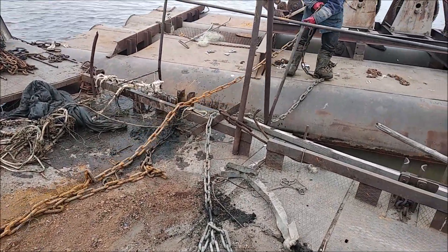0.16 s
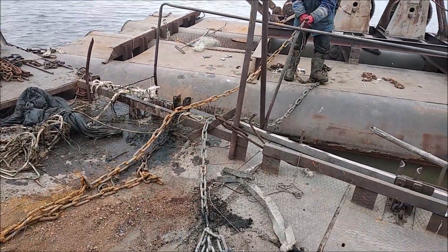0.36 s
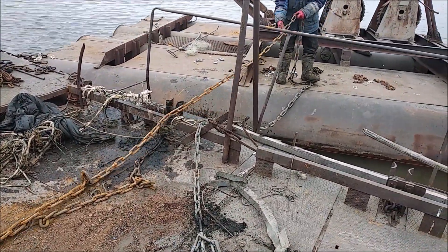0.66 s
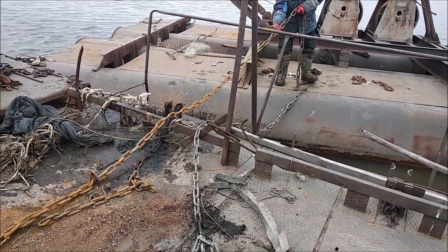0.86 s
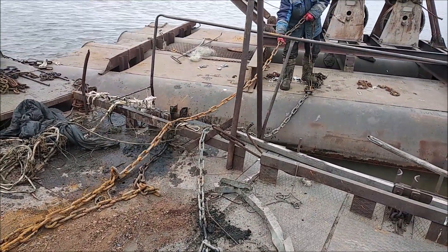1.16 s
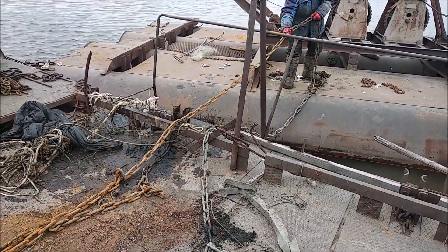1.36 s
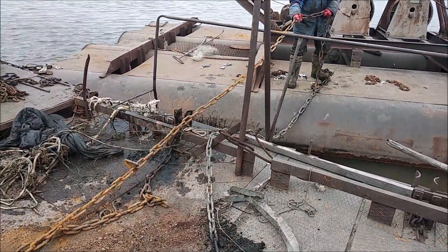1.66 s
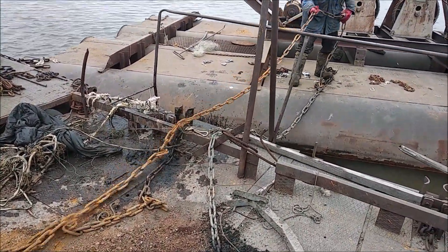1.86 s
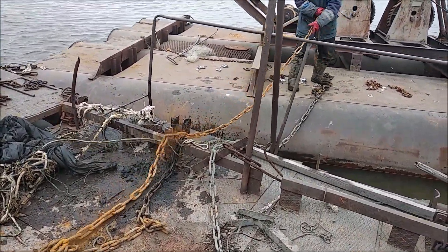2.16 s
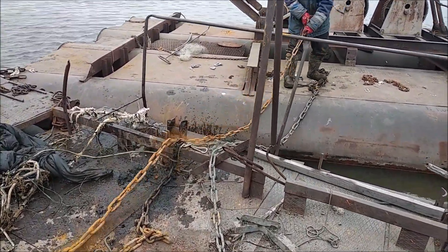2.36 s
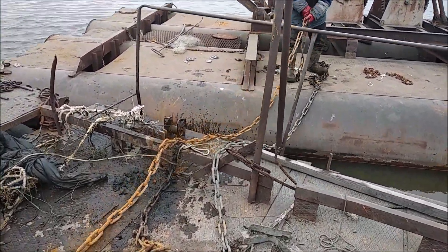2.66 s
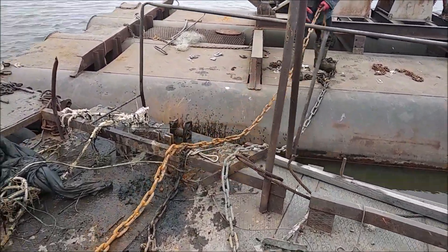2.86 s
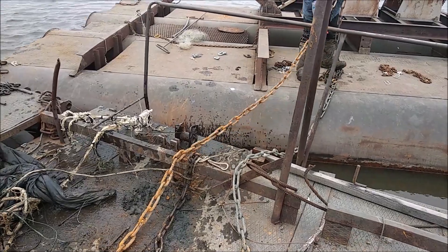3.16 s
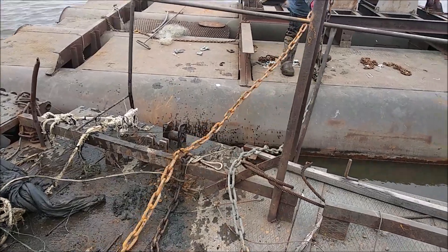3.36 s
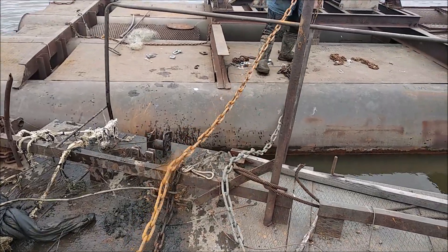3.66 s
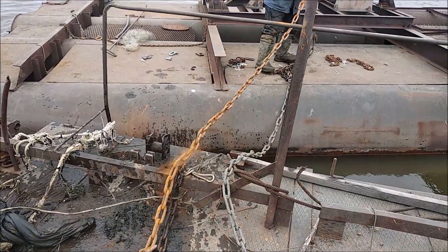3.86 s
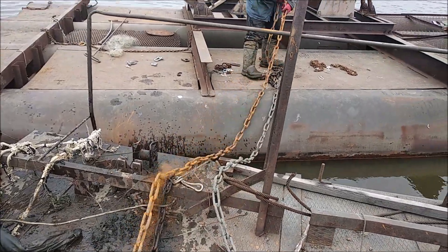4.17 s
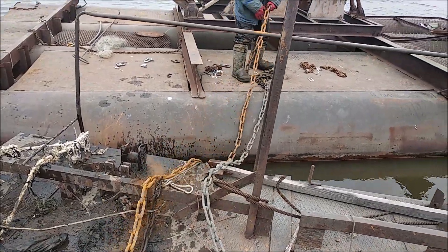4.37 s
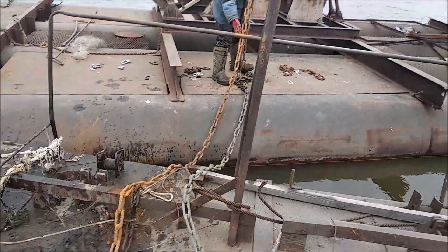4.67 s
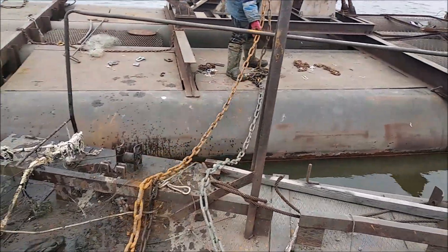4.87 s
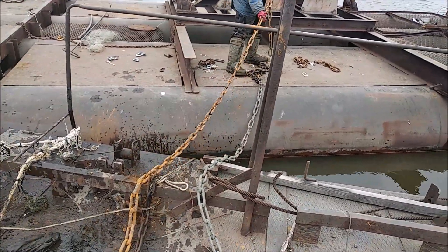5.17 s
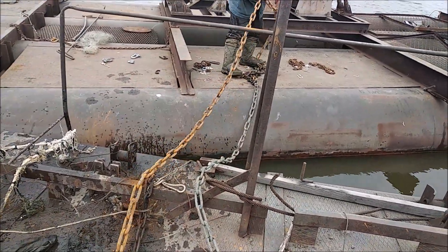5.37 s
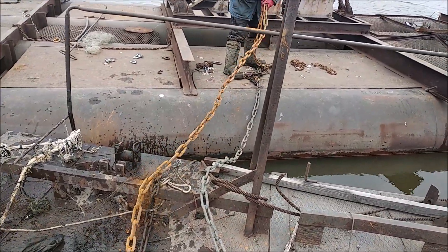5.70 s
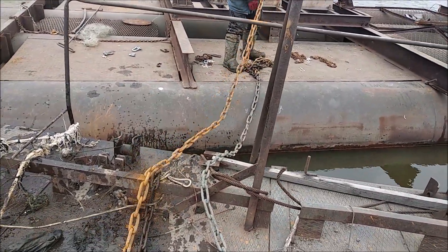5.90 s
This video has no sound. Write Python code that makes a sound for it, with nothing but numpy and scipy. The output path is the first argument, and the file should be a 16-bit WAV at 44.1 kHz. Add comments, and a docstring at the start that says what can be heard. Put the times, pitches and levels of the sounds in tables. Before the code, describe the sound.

A heavy rusty chain is hauled over a beam onto a hollow steel pontoon, outdoors on the water. Links clank on the plating, jingle against each other and scrape, while the hull booms softly. The pulling eases briefly, resumes with a hollow thump and harsh grinding, slackens, then ends with another rattling pull. Gusts buffet the microphone throughout, over a faint distant drone.

```python
"""A rusty steel chain is hauled over a beam onto a hollow steel pontoon, in gusty wind.
From the start, links clank on the plating, ring against each other and scrape off rust; the hull booms.
The haul eases near 1.4 s and resumes; the hull thumps at 3.79 s, the rust grinds hardest at 4.2 s.
The chain slackens from 4.6 s; a last pull starts at 5.3 s. Throughout, gusts buffet both microphone
ports over a faint far drone, and a gain control holds the loud moments down."""
import sys
import numpy as np
from scipy import signal
from scipy.fft import rfft, irfft, next_fast_len
from scipy.io import wavfile
from scipy.ndimage import uniform_filter1d, minimum_filter1d, map_coordinates

SR = 44100
rng = np.random.default_rng(int(sys.argv[2]) if len(sys.argv) > 2 else 0)


def write(x):
    x = np.atleast_2d(x).T
    wavfile.write(sys.argv[1], SR, np.round(np.clip(x, -1, 1) * 32767).astype(np.int16))


N = 266187

# Pull on the chain: t/s, rattle/dB, scrape/dB, jingle/dB
HAUL_LEVELS = [(0.0, -27, -35, -44), (0.28, -37, -37.5, -36), (0.4, -41.5, -61, -71),
               (0.44, -29.5, -36, -39), (0.68, -37, -41.5, -49), (0.86, -33.5, -41, -38),
               (1.11, -34, -44, -55), (1.33, -43.5, -49, -52), (1.4, -106, -72, -61), (1.46, -53, -83, -55),
               (1.58, -40.5, -49.5, -79), (1.8, -31, -33, -39), (2.5, -31.5, -38.5, -35),
               (2.6, -35.5, -62, -49), (2.78, -42, -60, -68), (2.89, -57, -53, -38),
               (2.93, -56, -42, -44.5), (3.25, -45.5, -65, -35.5), (3.29, -27, -43, -32.5),
               (3.41, -37, -50, -35), (3.52, -40.5, -41, -70), (3.66, -34, -31.5, -32),
               (3.95, -27, -25, -41), (4.1, -42, -34, -36), (4.2, -13.5, -18.5, -51),
               (4.34, -33.5, -36, -43), (4.44, -17, -30, -40), (4.57, -44, -41.5, -41),
               (4.63, -54, -69, -55), (4.69, -51, -47.5, -51), (4.77, -48.5, -74, -62),
               (5.04, -61, -71, -75), (5.33, -51, -58, -74), (5.35, -21, -32.5, -46), (5.55, -24, -37, -34),
               (5.65, -25.5, -37.5, -59), (5.7, -26.5, -36, -68), (6.04, -26, -42, -32)]
# Links dropping on the plate: t/s, level/dB, low-mode weight/dB, damping factor, favoured f/Hz
PLATE_CLANKS = [(0.0167, -14.5, -14, 0.85, 3100), (0.1637, -25, -24, 1.6, 3200),
                (0.203, -15, -10, 2.4, 3400), (0.266, -14, -18, 1.26, 3760),
                (0.4316, -15, -1.5, 0.61, 3050), (0.5171, -15.5, -2, 0.89, 2960),
                (0.664, -26.5, 5, 4.5, 2210), (0.898, -9, -3, 1.17, 3300), (1.0507, -18.5, -8, 2, 3100),
                (1.066, -21, 1, 2.3, 2400), (1.177, -31, -8, 3, 4200), (1.2868, -34, 14, 3, 2140),
                (1.446, -41, 7, 0.47, 3160), (1.598, -33.5, 9, 0.57, 1810), (1.662, -15.5, -5, 2.3, 3740),
                (1.9404, -26.5, 6, 1.7, 1630), (1.9662, -20.5, -4, 0.89, 2100),
                (2.0219, -19, 2, 0.75, 3040), (2.082, -14, 1.5, 2, 1620), (2.1423, -19, -2.5, 1.35, 3230),
                (2.282, -16.5, -2, 0.92, 3100), (2.358, -14, 4.5, 1.1, 1150),
                (2.4243, -14, -2.5, 0.59, 2320), (2.5171, -13, -6.5, 1.3, 3000),
                (2.604, -20.5, -11, 3.4, 3020), (2.782, -23, 1.5, 1.4, 2880),
                (2.9159, -18.5, -3.5, 0.76, 3080), (2.9474, -23.5, -0.5, 0.77, 2090),
                (3.044, -5.5, -11.5, 1.64, 2220), (3.0988, -12.5, -2.5, 2.2, 3120),
                (3.273, -10.5, -4.5, 1.16, 3150), (3.3214, -11, -3.5, 1.53, 724),
                (3.5777, -23.5, 5, 1.06, 1970), (3.6009, -26, 4, 1.5, 2900), (3.6465, -21, 8, 1.7, 1780),
                (3.672, -20, 3, 2.8, 2870), (3.717, -17.5, -4, 0.36, 1810), (3.766, -10.5, 2, 1.5, 2740),
                (3.844, -20, -6, 1.1, 2170), (3.8851, -13.5, 2.5, 1.6, 2930), (3.9384, -38, -4, 1.8, 2500),
                (3.9608, -19.5, -10, 0.27, 3020), (3.9962, -12, -3, 0.84, 3420),
                (4.0538, -15.5, 0.5, 1.03, 2170), (4.0974, -10.5, -34, 1.3, 3430),
                (4.1735, -13, -9.5, 0.35, 2070), (4.3784, -23, -16, 1.8, 3050),
                (4.4317, -8, -1.5, 1.14, 3030), (4.646, -36, 6, 1.6, 2770), (4.686, -40.5, 13, 3.6, 1900),
                (4.909, -34.5, 10, 1.65, 2930), (5.008, -47.5, 12.5, 1.8, 2200),
                (5.106, -44.5, -1, 0.77, 2600), (5.138, -28.5, -7, 1.3, 3050),
                (5.184, -25.5, 0.5, 2.26, 2270), (5.3411, -15.5, -7.5, 0.25, 3150),
                (5.4147, -13, -15.5, 0.25, 3020), (5.5367, -13, -17, 1.26, 3200),
                (5.6622, -12, -3, 0.75, 3100), (5.746, -25, 1, 3.2, 3150), (5.81, -12, -4, 0.51, 3000),
                (5.938, -18, -17, 1, 2700), (5.9891, -19.5, -5, 0.48, 3300)]
# Plate mode strength: f/Hz, level/dB
PLATE_SPECTRUM = [(200, -35), (260, -6.5), (400, -11.5), (620, -6), (1000, -6.5), (1800, -4.5),
                  (3050, -2.5), (4000, -7), (5000, -18), (7000, -26)]
# Plate mode decay: f/Hz, t60/s
PLATE_DECAY = [(300, 0.62), (1200, 0.45), (3000, 0.27), (7000, 0.43)]
# Favoured low plate modes, sinking as the chain piles up: t/s, f/Hz
PLATE_LOW_GROUP = [(0, 1060), (1.5, 965), (2.5, 970), (3.3, 792), (6.04, 594)]
# Plate balance at the ports: f/Hz, pan/dB (left minus right throughout)
PLATE_PAN = [(500, -0.5), (1200, -1), (2800, 3), (5000, 0)]
# Link on link: t/s, level/dB, bright mode f/Hz, 2nd mode/dB, 1st mode/dB, pan/dB, damping factor
LINK_CLINKS = [(0.0941, -19.5, 9000, 0.5, -3, 2, 2.3), (0.258, -21.5, 9000, -11, -8, -4, 1.9),
               (0.4256, -30, 8830, 3.5, 2, -13, 1.7), (0.5887, -19.5, 8900, -10, -3, -5.5, 1.6),
               (0.608, -25, 8700, 4, -3, -9, 2.3), (0.83, -24, 8680, -3, -1, -10.5, 1.05),
               (0.867, -26, 8630, -2, -4, -8, 1.7), (0.883, -29, 8730, -8, -9, -7, 1),
               (0.937, -37.5, 8900, -18, -15, -9, 0.99), (1.355, -55, 8730, -2, 9, 2, 1.1),
               (1.599, -45.5, 8630, 3.5, -3, -3, 0.91), (2.134, -21.5, 9040, -9, -4, -4, 1.5),
               (2.214, -31, 8600, -5, -9, -5, 1.2), (2.2746, -14, 8720, -9, -11, -4, 1.4),
               (2.281, -28, 8700, -8, -11, -3, 1), (2.3064, -36, 8780, -7, -19, -12, 0.72),
               (2.386, -28, 8700, -16, -17, 0, 1.1), (2.4192, -25, 8600, -6, -8, -3, 1.1),
               (2.4816, -27.5, 8520, -18, -15, -2, 0.9), (2.6027, -22, 8500, -10, -12, -2, 1.6),
               (2.9117, -23.5, 8590, -1.5, -5, -5.5, 0.96), (2.9347, -38, 8470, -2, -13, -1, 0.9),
               (3.077, -29, 8800, 3, 2, -14, 2.1), (3.094, -45, 8730, 16, 13, -5, 0.74),
               (3.1764, -22.5, 8720, -6, -3.5, -4.5, 0.96), (3.2955, -29, 8620, 2, -1, -6, 0.49),
               (3.394, -42, 8740, 8, -5, -9, 1.2), (3.599, -28.5, 8900, -3, -4, -10, 1.4),
               (3.73, -32, 8660, 3, -9, -6, 1.3), (3.815, -38.5, 8670, 12, 8, -1, 0.75),
               (3.879, -33, 8550, -12, -12, 0, 1.1), (4.163, -40, 8500, 5, 2, -7, 1.6),
               (4.376, -16, 8540, -2, -15, -14, 4.5), (4.492, -44, 8430, 8, 7, -9, 1.1),
               (4.716, -61, 8500, -2, 14, -8, 1.3), (4.8206, -37, 8600, -1, 6.5, -4, 1.34),
               (4.842, -39.5, 8480, -14, -13, -6, 1.6), (4.9294, -61.5, 8600, 12, 20, -7, 1.4),
               (5.141, -53.5, 8630, 9, 15, -12, 1.6), (5.3857, -45, 8340, 9, 5, -12, 1.1),
               (5.503, -34, 8340, -8, -4, -13, 0.97), (5.898, -46, 8870, 5, -8, -19, 0.88),
               (5.9403, -28, 8840, -3, 0, -8, 1.3)]
# Modes of one link: f/Hz, level/dB, t60/s, relative pitch spread between links
LINK_MODES = [(4576, 4, 0.13, 0.0223), (5500, 6.5, 0.15, 0.0308), (7470, -6.5, 0.063, 0.042),
              (8615, 1, 0.17, 0.0144), (10040, -7.5, 0.22, 0.0171), (12700, -13, 0.07, 0.016),
              (13100, -16, 0.091, 0.014)]
# Grinding rust: f/Hz, level/dB
RUST_SPECTRUM = [(900, -15), (2000, -13.5), (3600, -12), (5200, -10), (6900, -8.5), (8400, -12),
                 (9500, -23), (10800, -20.5), (11800, -31), (14200, -25.5), (15700, -48)]
# Short hisses of a rusty link: t/s, level/dB
RUST_SCUFFS = [(0.258, -28), (1.176, -32.5), (2.42, -34), (4.17, -33), (4.376, -36), (4.674, -43),
               (4.84, -41), (5.668, -20), (1.94, -39)]
# Pontoon resonances: f/Hz, width/Hz, level/dB
HULL_MODES = [(180.4, 18, -6.5), (257, 35, 2), (353.7, 28, -2.5), (408, 53, -8), (660, 20, -12),
              (767, 20, -12.5), (880, 21, -11.5)]
# Hull driven by the chain: t/s, length/s, level/dB
HULL_BOOMS = [(0.0, 0.28, -34.5), (0.73, 0.16, -33), (1.45, 0.065, -56), (1.9, 0.5, -38),
              (2.91, 0.015, -53), (2.98, 0.023, -58), (3.13, 0.052, -37.5), (3.49, 0.052, -32.5),
              (3.6, 0.11, -35), (3.77, 0.16, -26.5), (3.94, 0.58, -33.5), (5.58, 0.067, -32),
              (5.68, 0.25, -38)]
# Gusts, left port then right port: t/s, length/s, level/dB
PORT_GUSTS = [
    [(0.09, 0.078, -28), (0.17, 0.25, -39.5), (0.42, 0.26, -30), (0.72, 0.16, -25), (1.03, 0.31, -26.5),
     (1.4, 0.18, -27.5), (1.64, 0.32, -34), (1.9, 0.5, -31), (2.48, 0.38, -26.5), (3.2, 0.085, -37),
     (3.32, 0.091, -31), (3.55, 0.37, -29), (3.95, 0.86, -36.5), (4.87, 0.47, -45.5), (5.3, 0.26, -35.5),
     (5.57, 0.091, -28.5), (5.7, 0.32, -32)],
    [(0.0, 0.059, -19.5), (0.09, 0.26, -32.5), (0.41, 0.24, -26), (0.7, 0.17, -25), (0.96, 0.33, -24),
     (1.34, 0.2, -30), (1.64, 0.42, -28), (2.11, 0.19, -27.5), (2.34, 0.43, -27.5), (2.9, 0.31, -28.5),
     (3.27, 0.073, -26), (3.49, 0.12, -23), (3.68, 0.036, -30), (3.78, 0.21, -25), (3.98, 0.18, -37),
     (4.23, 0.23, -27), (4.56, 0.11, -23), (4.74, 0.059, -37), (4.87, 0.06, -25), (5.12, 0.12, -29),
     (5.25, 0.065, -31.5), (5.39, 0.16, -34.5), (5.55, 0.26, -27), (5.81, 0.19, -30)],
]
# Eddies at a port: f/Hz, level/dB
GUST_SPECTRUM = [(15, -43), (30, -19), (60, 0.5), (110, 2), (170, -2.5), (260, -12.5), (420, -17.5),
                 (800, -32), (1500, -48), (3300, -120)]
# Wind puffs on the microphone, and one hull boom at 3.79 s: t/s, level/dB, f/Hz, pan/dB
LOW_THUMPS = [(0.424, -23.5, 256, -13), (0.722, -23, 117, -11), (0.764, -33, 81.4, -5),
              (0.844, -23, 140, 10), (0.997, -22, 91, -12.0), (1.104, -18.5, 93, -9),
              (1.164, -17.5, 134, 9), (1.414, -19, 119, 14), (1.461, -17.5, 201, 4), (1.763, -17, 94, -3),
              (1.809, -20, 131, -10), (2.495, -24, 151, -22), (2.581, -17, 210, -6), (2.637, -13, 116, -7),
              (2.69, -13.5, 167, 6), (2.722, -19, 99, 13), (2.759, -24, 168, -5), (2.906, -25.5, 177, -25),
              (2.974, -33.5, 111, -44), (3.011, -33, 102, -27), (3.157, -24, 196.5, -24),
              (3.223, -28, 78, 27), (3.333, -21.5, 103.6, 12), (3.459, -22, 247, -4),
              (3.505, -26, 102.4, -30), (3.699, -27, 81.5, 0), (3.787, -7.5, 255, 5),
              (3.829, -10.5, 107.8, -4), (3.898, -22, 268, -0.5), (4.483, -21.5, 98.5, -14),
              (4.898, -28, 119, 8), (5.132, -23, 134, -23), (5.178, -24, 86, -28.5),
              (5.592, -20.5, 111.5, -6), (5.629, -11, 114.4, 2)]
# Far machinery and water: f/Hz, level/dB
DRONE_SPECTRUM = [(24, -31), (60, -9), (100, 14), (330, -13), (640, -9), (1000, -9), (3000, -19),
                  (7000, -62), (10000, -24), (15700, -33)]
# Likeness of left and right: f/Hz, correlation
PORT_CORRELATION = [(60, 0.56), (130, 0.87), (290, 0.74), (640, 0.82), (1410, 0.24), (3100, 0.043),
                    (6820, -0.057), (15000, -0.013)]

RATTLE_DB, RATTLE_WEIGHT_DB, RATTLE_DAMPING, RATTLE_HZ = 1.5, 5.5, 1.18, 2380
RING_DB, CRACK_SHARE, CHATTER_DB = -4.5, 0.38, 0.5
JOLT_S, SHAKEN_DB, SHAKEN_FADE_DB_PER_S = 0.009, -23, 137
LOOSE_LOW_DB, MODE_SWELL_DB = -0.5, 3.5
CLANK_RUST_DB, CLINK_RUST_DB, RUST_FADE_DB_PER_S, SCUFF_FADE_DB_PER_S = -25, -20.5, 236, 400


def plate_clanks(count=380, rattles=170):
    """Each blow rings the dense plate modes at new strengths; small rattling blows follow the haul."""
    t = np.arange(SR // 4) / SR
    hz = 200 + 6800 * ((np.arange(count) + rng.random(count)) / count) ** 1.3
    t60_s = along(PLATE_DECAY, hz) * np.exp(0.093 * rng.standard_normal(count))
    modes = damped_sines(hz[:, None], t60_s[:, None], t)

    rattle_s = (np.arange(rattles) + rng.random(rattles)) * (N - 1) / SR / rattles
    rattle_db = haul_db()[0][(rattle_s * SR).astype(int)] + RATTLE_DB + 1.17 * rng.standard_normal(rattles)
    rattle_hz = RATTLE_HZ * np.exp(0.18 * rng.standard_normal(rattles))
    rattle = np.broadcast_arrays(rattle_s, rattle_db, RATTLE_WEIGHT_DB, RATTLE_DAMPING, rattle_hz)
    blows = np.vstack([np.transpose(rattle), PLATE_CLANKS])
    blow_s, blow_db, weight_db, dampings, spot_hz = blows.T

    mid, side = rng.standard_normal((len(blows), 2, count)).transpose(1, 0, 2)
    mid = mid * np.cos(side_angle_rad(hz)) - CRACK_SHARE  # modes in step: hard edge
    side = side * np.sin(side_angle_rad(hz))
    low_hz = np.interp(blow_s, *np.transpose(PLATE_LOW_GROUP))
    low_hz *= np.exp(0.2 * rng.standard_normal(len(blows)))
    favoured_hz = np.transpose([spot_hz, low_hz])[..., None]  # struck spot favours two mode groups
    spot_db = 7 * np.exp(-(np.log(hz / favoured_hz) / 0.12) ** 2).sum(axis=1)
    heavy_db = weight_db[:, None] / (1 + (hz / 1400) ** 4)
    shape = amp(along(PLATE_SPECTRUM, hz)) * hz ** 0.11
    strength = shape / np.linalg.norm(shape) * amp(heavy_db + spot_db + blow_db[:, None] + RING_DB)
    port_gains = np.float32(np.stack([mid + side, mid - side], 1) * strength[:, None])
    rings = (port_gains.reshape(-1, count) @ modes).reshape(len(blows), 2, -1)

    attack = (1 - np.exp(-t / 0.00038)) * (1 + 0.092 * amp(-60 * t / 0.0011))
    track = np.zeros((2, N + SR))
    for start_s, damping, ring in zip(blow_s, dampings, rings):
        bent_s = t * (1 + 0.0196 * rng.standard_normal())  # chain load detunes the plate
        ring = np.array([np.interp(bent_s, t, port) for port in ring])
        fade = amp(-150 * t * (damping - 1)) * np.minimum(1, (t[-1] - t) * 20)  # resting links damp it
        add(track, start_s, ring * fade * attack)
    chatter = unit_rms(amp(CHATTER_DB * wobble(160)))  # links bounce on the plate
    return filtered(track[:, :N] * chatter, lambda f: amp(along(PLATE_PAN, f) * [[.5], [-.5]]))


def link_clinks(count=8):
    """A jolt runs through a few links at each contact, each link tuned slightly apart."""
    t = np.arange(SR // 4) / SR
    hz, mode_db, t60_s, spread = np.transpose(LINK_MODES)[..., None]
    envelope = (1 - np.exp(-t / 0.0015)) * np.minimum(1, (t[-1] - t) * 20)
    bright = abs(hz - 8650) < 500
    track = np.zeros((2, N + SR))
    for start_s, db, bright_hz, second_db, first_db, pan_db, damping in LINK_CLINKS:
        scatter = rng.standard_normal((4, count, len(LINK_MODES), 1))
        detune = spread * scatter[0]
        other_hz = hz * (bright_hz / hz[bright]) ** 0.7
        tuned_hz = np.where(bright, bright_hz * (1 + .5 * detune), other_hz * (1 + detune))
        ring = damped_sines(tuned_hz, t60_s / damping * np.exp(0.15 * scatter[1]), t) * envelope
        low_db = np.where(hz < 5000, first_db, second_db) * (hz < 6000)
        gain = amp(db - 12 + mode_db + low_db + 2.0 * scatter[2:])
        gain *= rng.choice([-1, 1], size=gain.shape)  # short waves reach the ports unalike
        for link in range(count):
            add(track, start_s + link * JOLT_S * rng.random(), gain[:, link, :, 0] @ ring[link], pan_db)
    chatter = amp(2.3 * np.array([wobble(120), wobble(120)]))  # neighbours damp a link off and on
    return track[:, :N] * chatter


def link_jingle(count=8, touches_per_s=250):
    """Light touches keep loose links ringing; each mode swells and fades on its own."""
    touches = rng.standard_normal((2, N)) * (rng.random(N) < touches_per_s / SR)
    touches *= amp(3.9 * wobble(26.18))
    shaken = amp(2 * SHAKEN_DB) * tail_power(PLATE_CLANKS, SHAKEN_FADE_DB_PER_S)
    level = np.sqrt(amp(2 * haul_db()[2]) + shaken)
    driven, steady = 0, 0
    for hz, mode_db, t60_s, spread in LINK_MODES:
        tuned_hz = hz * (1 + 1.51 * spread * rng.standard_normal(count))
        width_hz = 4.5 / t60_s  # touching links ring shorter than free ones
        modes = [(link_hz, width_hz, width_hz ** -0.5) for link_hz in tuned_hz]
        gain = amp(mode_db + LOOSE_LOW_DB * (hz < 6000)) * unit_rms(amp(MODE_SWELL_DB * wobble(9)))
        driven += resonate(gain * level * touches, modes)
        steady += resonate(gain * touches, modes)
    return driven / np.std(steady) * amp([[-2.2], [2.2]])


def rust_scrape():
    """Rust grinds off in dense uneven grains of shifting colour; blows knock more loose."""
    grit = rng.standard_normal((2, N))
    grit *= amp(1.3 * rng.standard_normal(N) + 1.77 * wobble(40) + 1.7 * wobble(150))
    spectra = signal.stft(grit, nperseg=256)[2]
    patches = uniform_filter1d(rng.standard_normal(spectra.shape[1:]), size=4, axis=0)
    patches = uniform_filter1d(patches, size=12, axis=1)
    grit = signal.istft(spectra * amp(2.6 * unit_rms(patches)), nperseg=256)[1][:, :N]
    power = (amp(2 * haul_db()[1])
             + amp(2 * CLANK_RUST_DB) * tail_power(PLATE_CLANKS, RUST_FADE_DB_PER_S)
             + amp(2 * CLINK_RUST_DB) * tail_power(LINK_CLINKS, RUST_FADE_DB_PER_S)
             + tail_power(RUST_SCUFFS, SCUFF_FADE_DB_PER_S))
    return np.sqrt(power) * amp([[-1.5], [1.5]]) * stereo(grit, RUST_SPECTRUM)


def link_ticks(count=2400, samples=256, median_hz=3620, decay_cycles=9, drag_db=-4.5, clank_db=-26):
    """Dragged and jolted links knock together in a coarse rain of dull ticks."""
    starts = (np.sort(rng.random(count)) * N).astype(int)
    scatter = rng.standard_normal((count, 4))
    hz = np.clip(median_hz * np.exp(0.56 * scatter[:, :1]), 1200, 8800)
    t = np.arange(samples) / SR
    envelope = np.exp(-hz * t / decay_cycles) * (1 - t / t[-1]) * (1 - np.exp(-hz * t))
    ring = np.sin(2 * np.pi * hz * t) * envelope
    index = (starts[:, None] + np.arange(samples)).ravel()
    gain = amp(3.1 * scatter[:, 1:2] + 3.8 * scatter[:, 2:]) * rng.choice([-1, 1], size=(count, 2))
    ticks = [np.bincount(index, (ring * gain[:, [port]]).ravel(), N + samples)[:N] for port in range(2)]
    dragged = amp(2 * (haul_db()[1] + drag_db))
    jolted = amp(2 * clank_db) * tail_power(PLATE_CLANKS, RUST_FADE_DB_PER_S)
    return np.sqrt(dragged + jolted) * unit_rms(np.array(ticks))


def hull_boom():
    """Lumpy chain knocks drive the lowest pontoon modes, much alike at both ports."""
    power = spell_power(HULL_BOOMS, edge_s=0.0056)
    knocks = rng.standard_normal((2, N)) * amp(1.94 * wobble(25)) * np.sqrt(power)
    shared, apart = resonate(knocks, [(hz, width_hz, amp(db)) for hz, width_hz, db in HULL_MODES])
    boom = np.array([shared + 0.39 * apart, shared - 0.083 * apart])
    return np.sqrt(np.mean(power)) * unit_rms(boom)


def wind_gusts(lull_db=-85, flutter_above_hz=227, flutter_db=4):
    """Eddies hit each port in lumps with sharp positive crests."""
    level = np.sqrt([spell_power(port, edge_s=0.043) + amp(2 * lull_db) for port in PORT_GUSTS])
    eddies = filtered(rng.standard_normal((2, N)), lambda hz: amp(along(GUST_SPECTRUM, hz)))
    eddies = unit_rms(eddies + 0.17 * eddies[::-1])
    crested = filtered(eddies + 0.19 * eddies ** 2, lambda hz: 1 / (1 + (40 / (hz + 1)) ** 4))
    upper = filtered(crested, lambda hz: 1 - 1 / (1 + (hz / flutter_above_hz) ** 4))
    flutter = upper * (unit_rms(amp(flutter_db * wobble(14))) - 1)
    lumps = amp(3.7 * np.array([wobble(26), wobble(19)]))
    return level * unit_rms(lumps * (crested + flutter))


def low_thumps(decay_cycles=2.53, overtone_db=-11):
    """Short damped swings: wind puffs on the microphone, and one boom of the hollow hull at 3.79 s."""
    t = np.arange(SR // 8) / SR
    track = np.zeros((2, N + SR))
    for start_s, db, hz, pan_db in LOW_THUMPS:
        phase = 2 * np.pi * hz * t
        swing = np.sin(phase) + amp(overtone_db) * np.sin(2.1 * phase + 2 * np.pi * rng.random())
        envelope = np.exp(-hz * t / decay_cycles) * (1 - np.exp(-t / 0.0031))
        add(track, start_s, amp(db - 3.0) * envelope * swing, pan_db)
    return track[:, :N]


def far_drone(level_db=-55.5):
    """Faint steady wash of far machinery and water."""
    return amp(level_db + 0.54 * wobble(1.4)) * stereo(rng.standard_normal((2, N)), DRONE_SPECTRUM)


def amp(db):
    """Gain of a level; amp(2 * db) is its power."""
    return 10 ** (np.asarray(db) / 20)


def unit_rms(x):
    """Scale to rms 1."""
    return x / np.sqrt(np.mean(x ** 2) + 1e-20)


def along(points, hz):
    """Read (f/Hz, value) points on a log axis."""
    knots_hz, values = np.transpose(points)
    return np.interp(np.log(hz + 1), np.log(knots_hz + 1), values)


def haul_db():
    """Rattle, scrape and jingle levels per sample."""
    knots_s, *levels = np.transpose(HAUL_LEVELS)
    return [np.interp(np.arange(N) / SR, knots_s, db) for db in levels]


def wobble(knots_per_s):
    """Smooth random curve."""
    knots = rng.standard_normal(int(N * 200 / SR) + 4)
    return map_coordinates(knots, [np.arange(N) * knots_per_s / SR])


def spell_power(spells, edge_s):
    """Power of sounds that rise, hold and fall."""
    t = np.arange(N) / SR
    return sum(amp(2 * db) * np.clip(np.minimum(t - s, s + length_s - t) / edge_s + .5, 0, 1) ** 2
               for s, length_s, db in spells)


def tail_power(events, fade_db_per_s, rise_s=0.0027):
    """Power after each blow: brief rise, then decay."""
    blows = np.zeros(N)
    for start_s, db, *_ in events:
        blows[int(start_s * SR)] = amp(2 * db)
    rise, fall = np.exp(-1 / (rise_s * SR)), amp(-2 * fade_db_per_s / SR)
    return signal.lfilter([1 - rise], np.convolve([1, -rise], [1, -fall]), blows)


def damped_sines(hz, t60_s, t):
    """Free ringing, one row per mode."""
    t, hz, t60_s = (np.float32(v) for v in (t, hz, t60_s))
    return np.exp(-np.float32(np.log(1000)) * t / t60_s) * np.sin(np.float32(2 * np.pi) * hz * t)


def filtered(x, response):
    """Apply a frequency response."""
    size = next_fast_len(N + 8192)
    return irfft(rfft(x, size) * response(np.fft.rfftfreq(size, 1 / SR)), size)[..., :N]


def resonate(x, modes):
    """Parallel resonators of alternating sign: f/Hz, width/Hz, gain."""
    return filtered(x, lambda f: sum(
        (-1) ** k * gain * 1j * f * width_hz / (hz * hz - f * f + 1j * f * width_hz)
        for k, (hz, width_hz, gain) in enumerate(modes)))


def side_angle_rad(hz):
    """Mid-side angle that gives the port correlation."""
    return np.arccos(along(PORT_CORRELATION, hz)) / 2


def stereo(pair, spectrum):
    """Colour two unrelated signals and mix to left and right, rms 1."""
    def response(hz):
        angle = side_angle_rad(hz)
        return amp(along(spectrum, hz)) * [np.cos(angle), np.sin(angle)]
    mid, side = filtered(pair, response)
    return unit_rms(np.array([mid + side, mid - side]))


def add(track, start_s, sound, pan_db=0):
    """Mix a sound into the stereo track."""
    track[:, int(round(start_s * SR)):][:, :sound.shape[-1]] += sound * amp([[pan_db / 2], [-pan_db / 2]])


def scene():
    """Chain, hull, wind and drone at the two ports."""
    chain = plate_clanks() + link_clinks() + link_jingle() + rust_scrape() + link_ticks()
    return chain + hull_boom() + wind_gusts() + low_thumps() + far_drone()


def record(dry):
    """Gain control, soft clipping, band limit."""
    threshold_db, ceiling, top_hz = -20, 0.4, 15800
    rms = np.sqrt(np.abs(uniform_filter1d(np.mean(dry ** 2, axis=0), size=256)))
    needed = np.minimum(1, (amp(threshold_db) / (rms + 1e-9)) ** 0.93)
    gain = uniform_filter1d(minimum_filter1d(needed, size=1024, origin=380), size=256)
    held = dry * gain
    rounded = held / (1 + np.abs(held / ceiling) ** 4) ** .25
    return filtered(rounded, lambda hz: hz < top_hz)


dry = scene()
out = record(dry)
write(out)
```